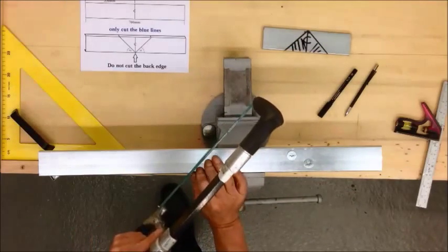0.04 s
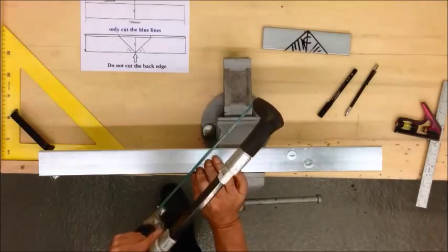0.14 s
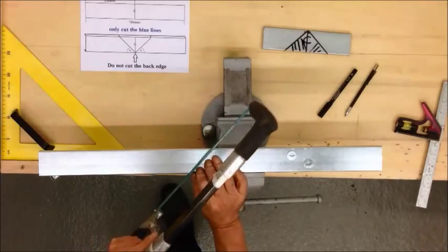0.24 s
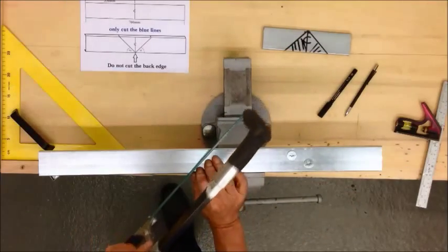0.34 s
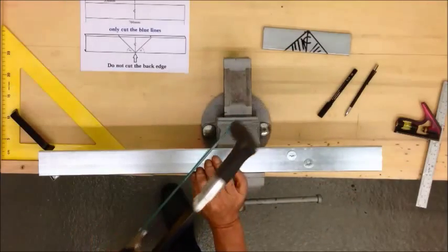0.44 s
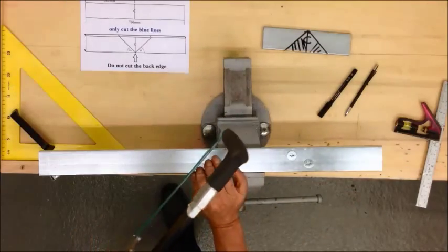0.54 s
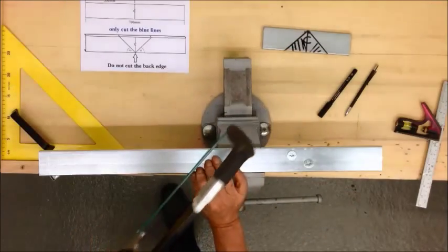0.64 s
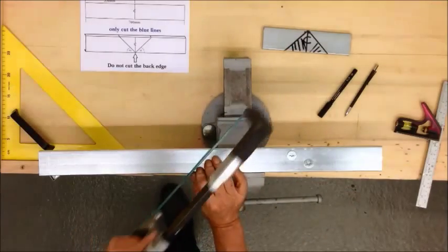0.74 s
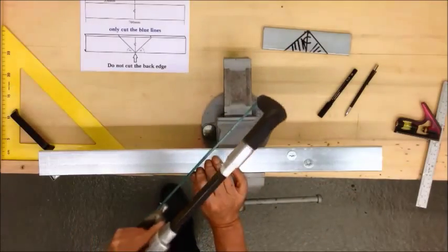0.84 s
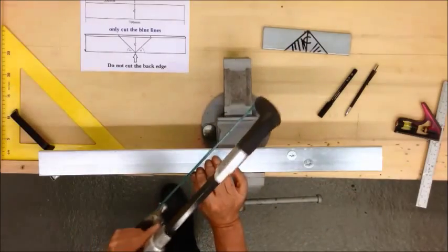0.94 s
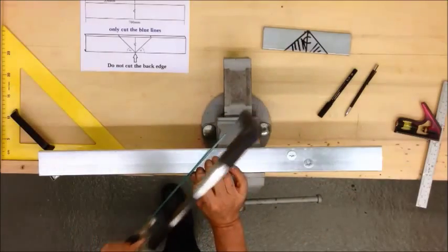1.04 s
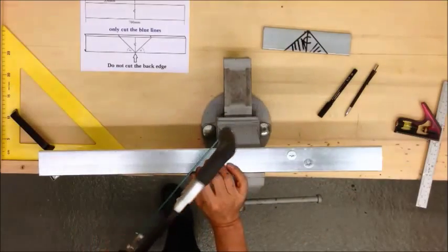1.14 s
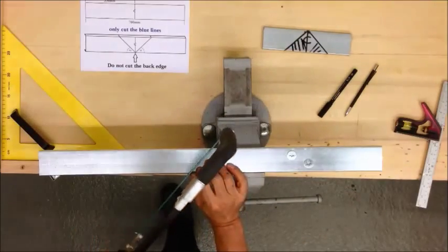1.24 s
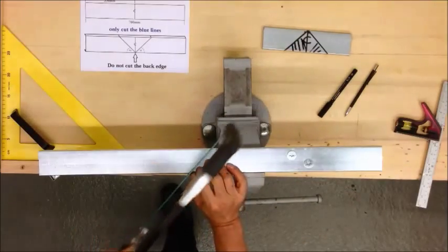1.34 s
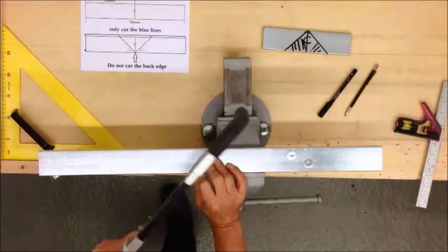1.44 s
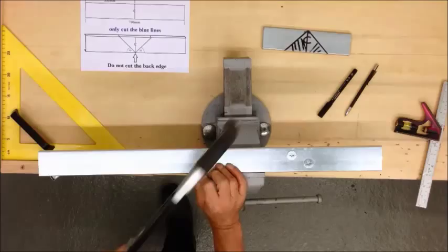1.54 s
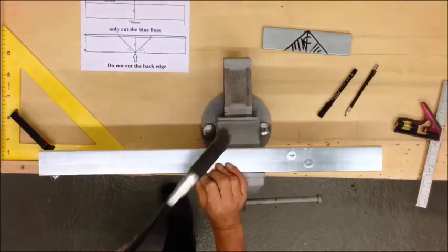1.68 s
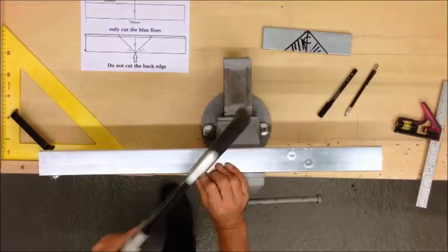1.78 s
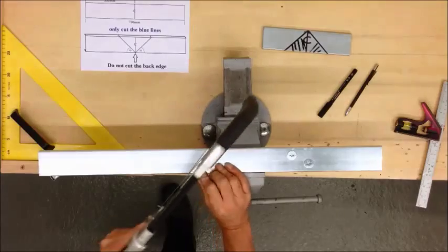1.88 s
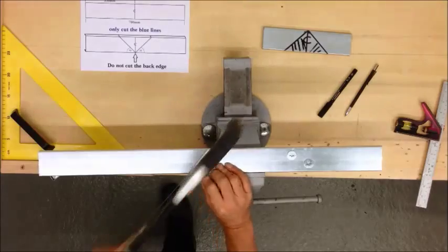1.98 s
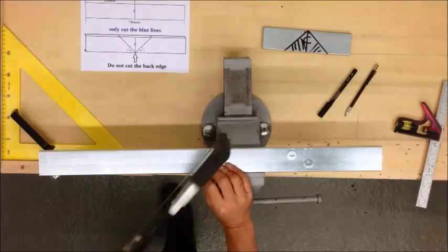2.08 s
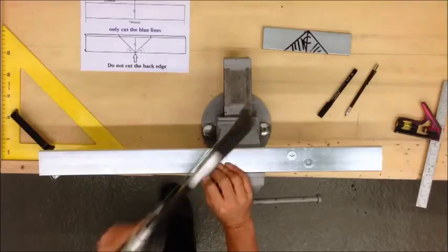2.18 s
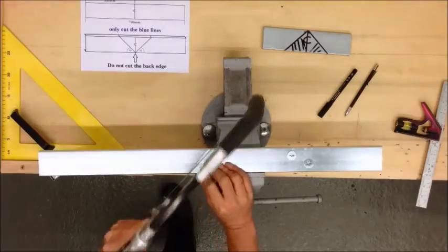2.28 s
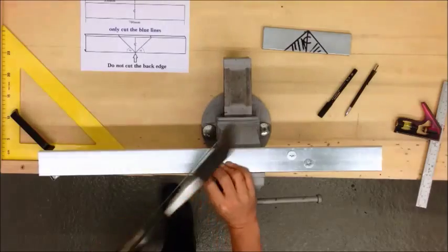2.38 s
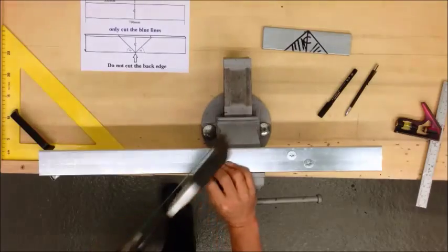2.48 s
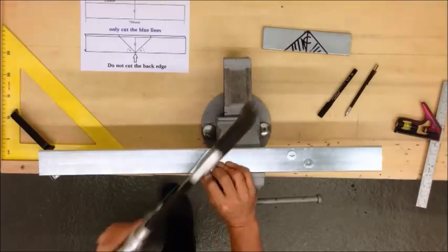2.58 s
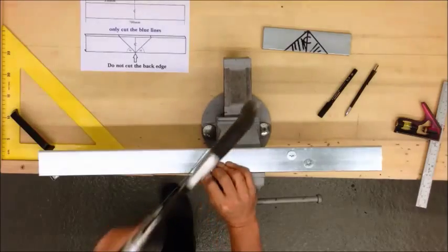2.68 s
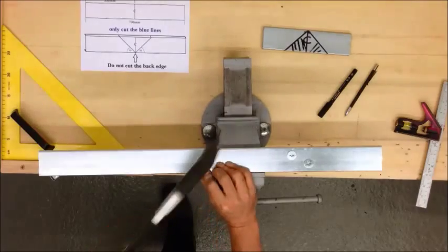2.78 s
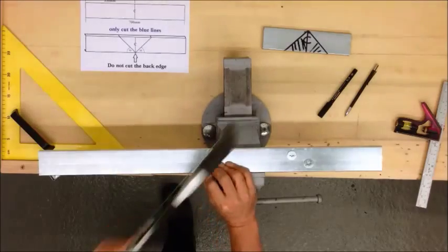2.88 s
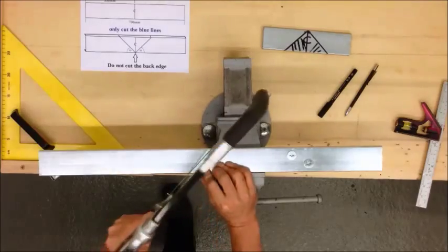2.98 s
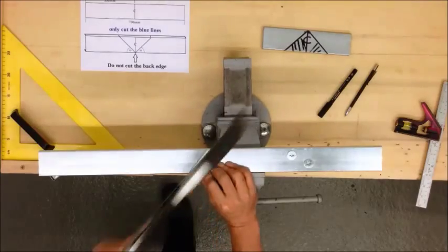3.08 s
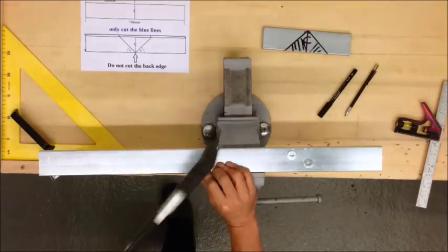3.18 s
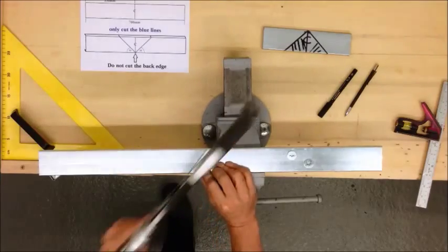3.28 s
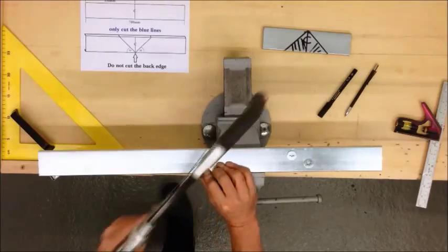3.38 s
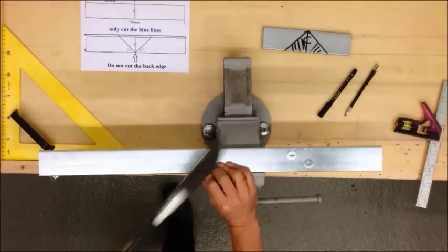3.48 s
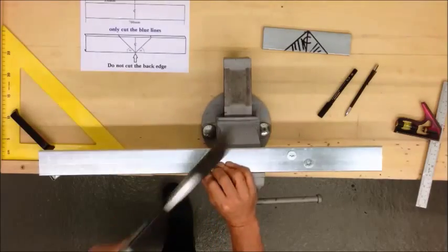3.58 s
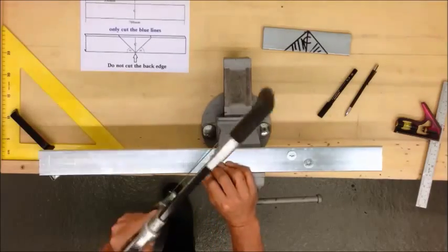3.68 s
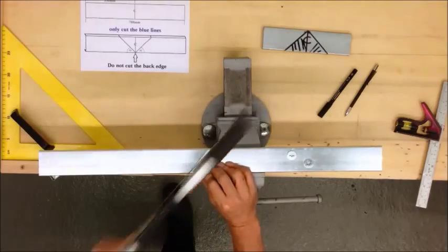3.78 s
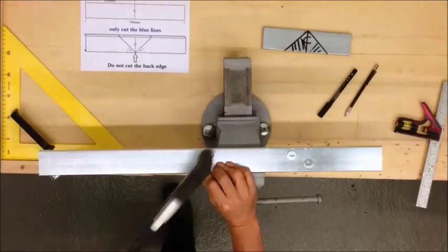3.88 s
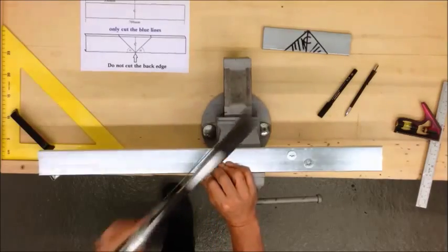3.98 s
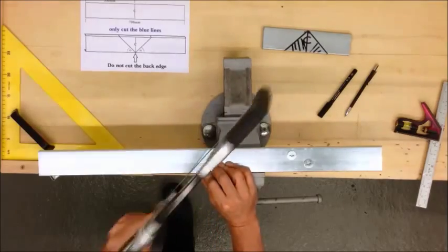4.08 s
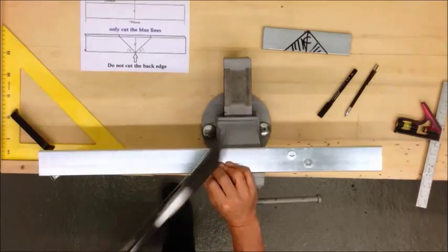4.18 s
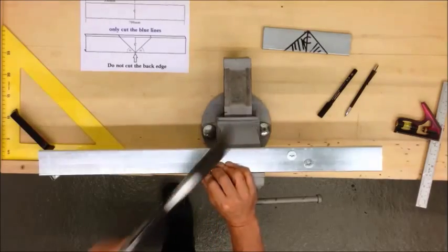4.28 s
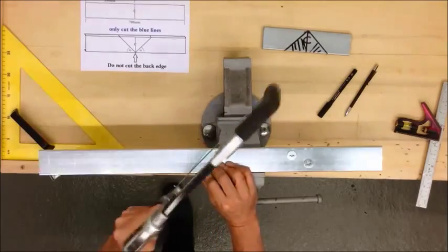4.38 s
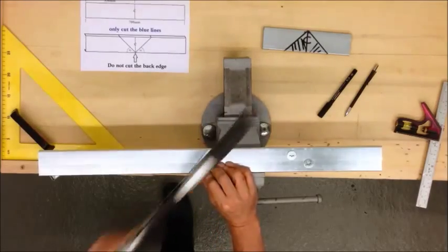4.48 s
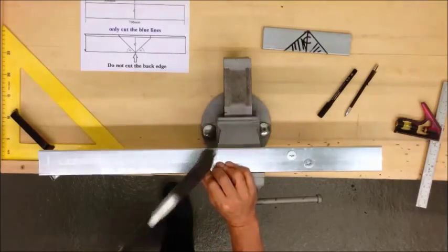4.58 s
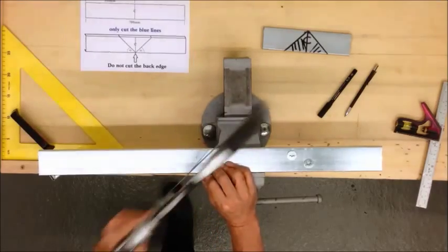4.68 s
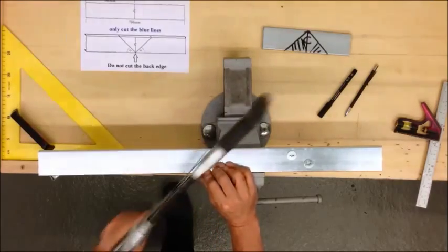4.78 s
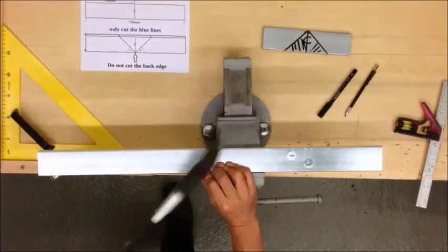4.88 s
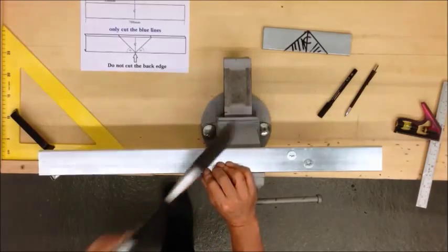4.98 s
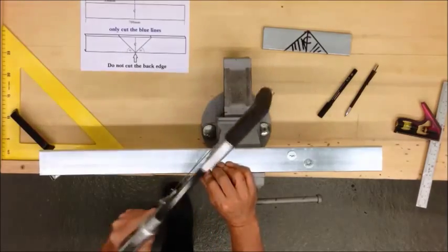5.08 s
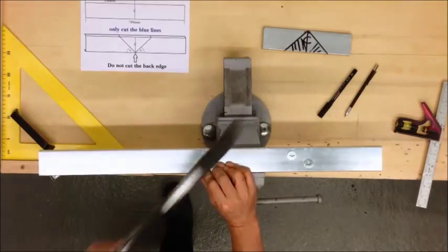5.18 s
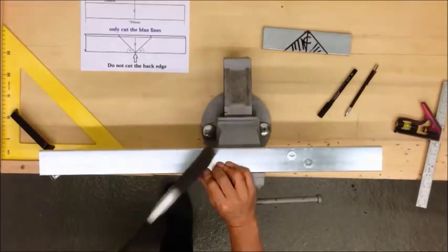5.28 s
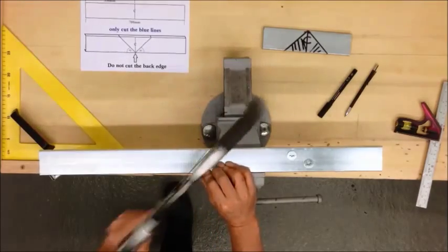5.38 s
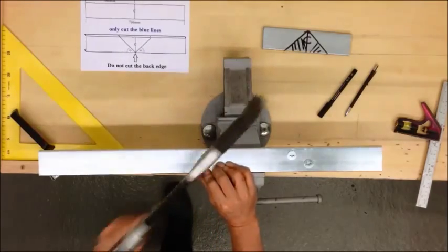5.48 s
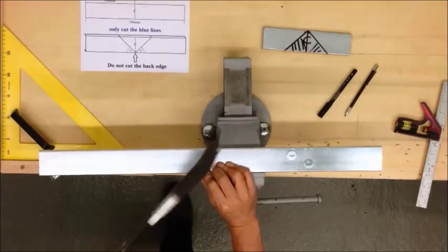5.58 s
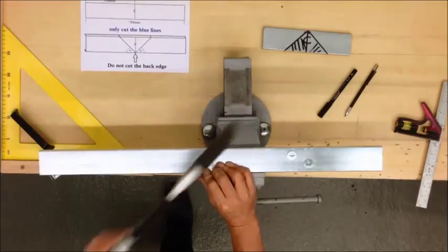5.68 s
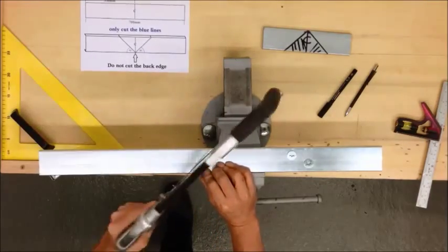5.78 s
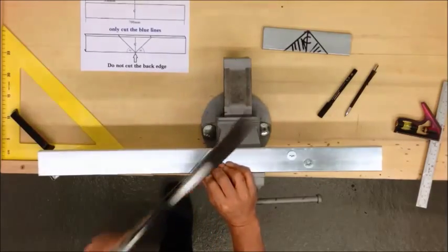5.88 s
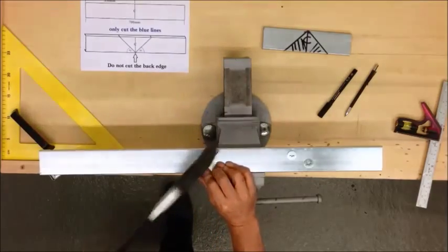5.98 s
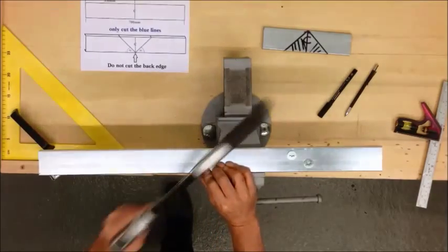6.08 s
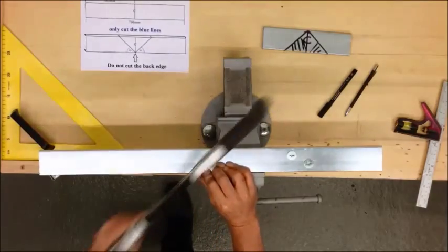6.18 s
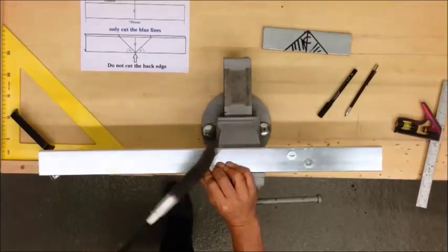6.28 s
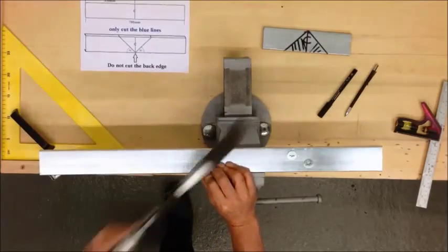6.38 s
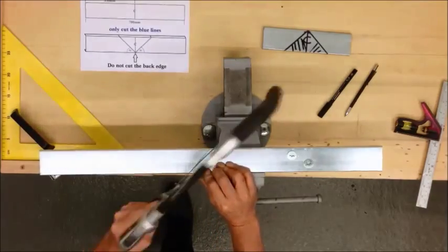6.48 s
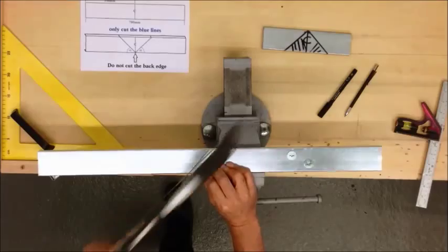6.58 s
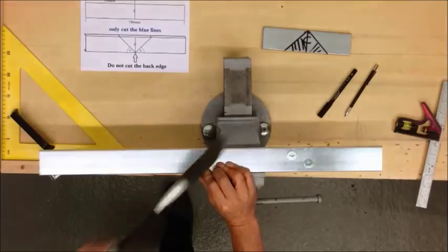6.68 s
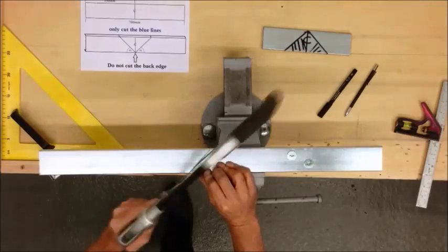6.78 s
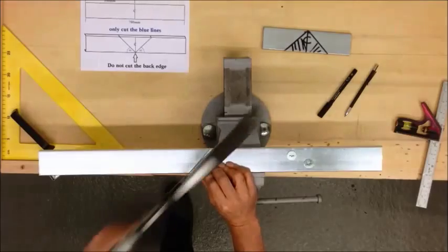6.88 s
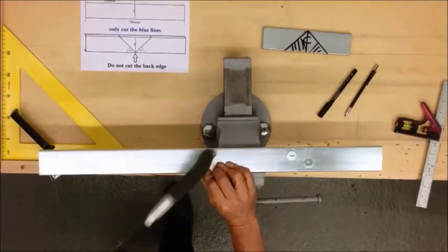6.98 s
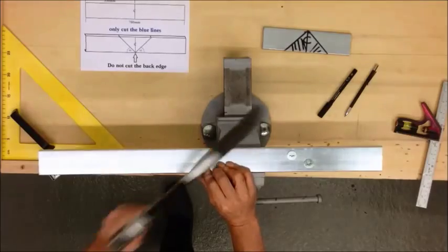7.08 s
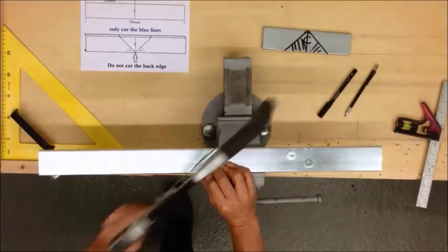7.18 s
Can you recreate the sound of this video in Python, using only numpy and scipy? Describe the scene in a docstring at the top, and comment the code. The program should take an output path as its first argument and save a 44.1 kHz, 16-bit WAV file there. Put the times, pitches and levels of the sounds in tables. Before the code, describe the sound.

A hand hacksaw rasps through thin sheet steel, a few slow strokes building to quick even ones with metallic ringing and squeaks.

```python
"""Hacksaw on sheet steel

A hand hacksaw cuts thin sheet in a bench vise: a few slow starting strokes, then quick even ones.
The teeth strike the edge at a rate that rises and falls with each stroke; their blows and the tearing
chips ring sheet and blade. The blade squeaks as the kerf deepens, the bench rumbles under the arm,
and a small workshop answers."""
import sys
import numpy as np
from scipy import signal
from scipy.fft import rfft, irfft
from scipy.io import wavfile
from scipy.ndimage import uniform_filter1d

SR = 44100
rng = np.random.default_rng(int(sys.argv[2]) if len(sys.argv) > 2 else 0)


def generate_wav(sig):
    """Save sig (samples, or channels by samples) to the path in sys.argv[1] as 16-bit PCM at SR."""
    pcm = np.round(np.clip(np.atleast_2d(sig).T, -1, 1) * 32767).astype(np.int16)
    wavfile.write(sys.argv[1], SR, pcm)


N = 319284
T = np.arange(N) / SR

# Levels in the tables are relative: each layer sets its own gain on top.
# workshop room tone: freq_hz, level_db
AIR_EQ = [(25, -1), (75, -1.5), (180, -0.5), (300, -13.5), (700, -9.5), (1400, -14.5), (2500, -13),
          (6000, -45), (15000, -45)]
# colour of tearing chips: freq_hz, level_db
SCRAPE_EQ = [(200, -38), (480, -15), (800, -5), (1030, -7.5), (1250, 6.5), (1650, -5), (2350, -0.5),
             (2950, -3.5), (4200, 0.5), (4900, -4), (7400, -4), (10000, -8), (13000, -6), (15300, -14)]
# ring of sheet, blade and frame: pitch_hz, width_hz, level_db
STEEL_MODES = [(641, 6.8, 11), (930, 77, -3.5), (1206, 12, -8), (1334, 6.3, 11.5), (1467, 16, -1.5),
               (1712, 20, 2.5), (1795.2, 10, -17), (1900, 12, -11), (2320, 32, -1), (2655, 50, -2.5),
               (3418, 29, 0), (3585, 38, 0.5), (4079, 74, 7.5), (4205, 26, 0.5), (5190, 70, -3),
               (7160, 59, -14), (9200, 120, -4), (12600, 240, -10)]
# fine high ring of the sheet: pitch_hz, width_hz (before sharpening), level_db
SHIMMER_MODES = [(7410, 65, -2.5), (9100, 60, 1), (10700, 120, 1), (11450, 290, -8), (12300, 350, -7),
                 (13300, 58, -6), (14300, 78, -6)]
# ring of the sheet's free edge: pitch_hz, width_hz, level_db
EDGE_MODES = [(1193, 18.4, 3.5), (1268, 15, 3), (1325, 7.4, 7), (1393, 6.4, 6), (1497, 66, -3),
              (3540, 30, -16), (3970, 53, -6), (4220, 19, -1)]
# single teeth snagging hard on the edge: start_s, level_db
HARD_SNAGS = [(.164, -49), (.63, -26.5), (1.125, -39.5), (2.174, -24.5), (4.14, -21.5), (4.827, -22.5),
              (5.642, -21)]
# pushes and pulls in turn, rate and bite at mid-stroke: start_s, length_s, tooth_rate_hz, bite_db
STROKES = [(0.323, 0.46, 420, -52.5), (.775, 0.25, 640, -47.5), (1.099, 0.24, 680, -43),
           (1.466, .18, 600, -52.5), (1.644, 0.17, 960, -41), (1.821, 0.22, 890, -45),
           (2.048, 0.19, 1000, -40.5), (2.243, 0.2, 900, -41.5), (2.434, 0.18, 1250, -34.5),
           (2.617, 0.19, 1000, -41), (2.822, 0.16, 1400, -34), (2.983, 0.18, 1830, -38.5),
           (3.174, 0.16, 1750, -35.5), (3.331, 0.19, 1970, -38.5), (3.527, 0.17, 1920, -35.5),
           (3.69, 0.19, 2050, -38), (3.88, 0.16, 2220, -35), (4.044, 0.19, 2150, -37.5),
           (4.237, 0.16, 1960, -35.5), (4.396, 0.19, 2220, -36.5), (4.583, .16, 2320, -36.5),
           (4.754, 0.16, 2180, -38), (4.93, 0.16, 2000, -37.5), (5.088, 0.18, 1810, -36.5),
           (5.26, .179, 2280, -36.5), (5.44, 0.18, 1810, -35.5), (5.616, 0.18, 2030, -37.5),
           (5.789, 0.16, 1810, -39.5), (5.974, 0.19, 2290, -37), (6.156, 0.13, 2160, -40),
           (6.307, 0.17, 2510, -37.5), (6.483, 0.17, 2390, -40), (6.65, 0.16, 2140, -39),
           (6.82, 0.16, 2290, -43), (6.984, 0.16, 2470, -38), (7.164, 0.19, 2700, -39)]
# feel of each direction: slow_sag_db, quick_sag_db (bite lost over a stroke),
# then the trims snag_db, squeak_db, tone_db, rumble_db, whistle_db
PUSH_FEEL = dict(slow_sag_db=-3.5, quick_sag_db=12, snag_db=9, squeak_db=4, tone_db=-1, rumble_db=-3, whistle_db=-1)
PULL_FEEL = dict(slow_sag_db=18, quick_sag_db=-1, snag_db=-7, squeak_db=-2.5, tone_db=1, rumble_db=1.5, whistle_db=0.5)
# the balance as the kerf deepens: time_s, tone_db, rumble_db, whistle_db
KERF_MIX = [(.4, -10, -69, -15), (1.2, -11.5, -64.5, -13.5), (1.798, -10.5, -59.5, -9.5),
            (2.6, -6.5, -55, -13), (3.3, -2.5, -56, -8), (4.1, -0.5, -52.5, -7), (4.5, -2, -57, -1),
            (4.8, 0, -56, -8.5), (5.3, 2, -54, -8), (5.8, 3, -56, -7.5), (6.4, 5, -57.5, -4),
            (7.2, 5, -60.5, -12)]
# colour of tooth blows: freq_hz, level_db
TOOTH_EQ = [(150, -28.5), (450, -10), (780, -8), (1050, -8), (1400, 4), (1900, 4.5), (2450, 3.5),
            (3000, -9.5), (4200, -8.5), (5500, -13.5), (12000, -22.5)]
# colour of the bench rumble: freq_hz, level_db
BENCH_EQ = [(25, -27), (60, -22), (90, -5.5), (115, -1.5), (155, -5), (200, 1), (250, 0.5), (310, -5.5),
            (420, -10), (800, -17), (2000, -84)]
# ring of bench top and vise: pitch_hz, width_hz, level_db
BENCH_MODES = [(114.2, 6.5, 5.5), (134.4, 4.1, 2.5), (181.5, 4.6, 7.5), (217, 2.9, 8.5), (259, 2.6, 1.5),
               (354, 3.8, 11)]
# loudest squeaks of the blade in the kerf: start_s, length_s, pitch_hz, level_db
LOUD_SQUEAKS = [(.803, 0.037, 1275, -39.5), (1.835, 0.074, 1254, -42), (3.045, .024, 1754, -32.5),
                (3.387, 0.032, 1781, -31.5), (3.919, .035, 1783, -30), (4.137, 0.013, 2156, -26),
                (4.278, 0.015, 1882, -25.5), (4.28, 0.0421, 3570, -30), (4.501, 0.02906, 1705, -31),
                (4.615, .019, 1900, -24.5), (4.785, 0.01405, 2058, -27), (4.822, 0.022, 2218, -27.5),
                (4.955, .022, 1755, -25.5), (5.145, 0.0498, 1800, -29), (5.534, .017, 1780, -26),
                (5.633, 0.0256, 1342, -27.5), (5.883, 0.023, 1763, -33.5), (6.183, 0.02, 2080, -27),
                (6.675, 0.031, 2414, -28), (6.895, .014, 2210, -27), (7.199, .028, 2257, -27.5)]
# the bench jolting under the arm: start_s, rise_s, level_db
BENCH_JOLTS = [(1.526, 0.017, -60), (1.839, 0.0082, -50), (2.388, .012, -56), (2.731, .012, -49),
               (3.494, 0.01, -46), (3.839, .009, -49), (4.084, 0.02, -46), (4.994, .012, -48)]

SLOW_HZ, QUICK_HZ = 452, 1900  # tooth rates of a careful stroke and of one in full swing
NOTCH_S, SINK_DB_PER_S = 1.56, 7  # the blade skates in a notch until then; later the kerf damps the edge
BINDS_FROM_S = 4  # from here on the kerf is deep enough to pinch the blade at the turns


def undb(db):
    """Decibels to gain."""
    return 10 ** (np.asarray(db) / 20)


def unit(x):
    """Scale to rms 1."""
    return x / np.sqrt(np.mean(x ** 2))


def noise():
    """White noise."""
    return rng.standard_normal(N)


def walk(rate):
    """Random drift with spread 1, changing about rate times a second."""
    return unit(np.interp(T * rate, np.arange(N), noise()))


def butter(x, hz, kind):
    """Second-order low-pass, high-pass or band-pass."""
    return signal.sosfilt(signal.butter(2, hz, kind, fs=SR, output="sos"), x)


def colour(x, points, size=4096):
    """Minimum-phase EQ through (freq_hz, level_db) points that keeps the power of white noise."""
    hz, db = np.transpose(points)
    grid = np.maximum(np.fft.rfftfreq(size, 1 / SR), 1)
    cepstrum = irfft(np.log(undb(np.interp(np.log(grid), np.log(hz), db))))
    cepstrum[1:size // 2] *= 2
    cepstrum[size // 2 + 1:] = 0
    response = irfft(np.exp(rfft(cepstrum)))
    return signal.fftconvolve(x, response / np.linalg.norm(response))[:N]


def ring(x, hz, width):
    """One mode, gain 1 at its centre."""
    return signal.lfilter(*signal.iirpeak(hz, hz / width, fs=SR), x)


def resonate(force, modes):
    """A force is heard directly and through every mode of the body it acts on."""
    return force + sum(undb(db) * ring(force, hz, width) for hz, width, db in modes)


def room_tone(level_db=-69):
    """A faint, dark bed of workshop air."""
    return undb(level_db) * colour(noise(), AIR_EQ)


def resting_rub(level_db=-80):
    """Even at rest the blade rubs lightly in its notch."""
    return undb(level_db + 2 * walk(11.7)) * colour(noise(), SCRAPE_EQ)


def shimmer(force, gain_db=-3, sharpness=4):
    """Narrow high modes give the hiss its steely edge."""
    modes = (undb(db) * ring(force, hz, width / sharpness) for hz, width, db in SHIMMER_MODES)
    return undb(gain_db) * sum(modes)


def sheet_edge(bite, gain_db=-2.5, resting_db=-76, skate_db=-48, skate_shape=0.62,
               linger_hz=1336, linger_s=0.065, linger_db=-10):
    """Skating teeth ring the edge even at a light touch; the ring fades as the blade sinks in."""
    skating = undb(skate_db) * (bite / bite.max()) ** skate_shape
    damping = undb(-SINK_DB_PER_S * np.maximum(T - NOTCH_S, 0))
    drive = (bite + skating + undb(resting_db)) * damping
    rubbing = noise()
    rings = unit(sum(undb(db) * ring(ring(rubbing, hz, width), hz, 5 * width)
                     for hz, width, db in EDGE_MODES))
    # steady rubbing evens out the beats between the modes
    rings *= drive / np.sqrt(uniform_filter1d(rings ** 2, size=1500) + .05)
    # the least damped mode stores the drive and sings on through the pauses
    keep = np.exp(-1 / (linger_s * SR))
    stored = signal.lfilter([1 - keep], [1, -keep], drive)
    lingering = stored * np.sin(2 * np.pi * linger_hz * T + .7 * walk(9.3))
    return undb(gain_db) * (rings + undb(linger_db) * lingering)


def workshop(x, wet_db, t60_s=0.4, treble_t60_s=0.32, late_t60_s=1.0, late_db=-21):
    """Bench top and near walls answer at once; the rest of the room leaves a faint tail."""
    t = T[:SR]
    near, far = rng.standard_normal((2, SR))
    low = butter(near, 7000, "low") * undb(-60 * t / t60_s)
    high = butter(near, 7000, "high") * undb(-60 * t / treble_t60_s)
    early = (low - high) * (t > .002)
    late = butter(far, 5000, "low") * undb(-60 * t / late_t60_s)
    response = undb(wet_db) * early / np.linalg.norm(early) + undb(late_db) * late / np.linalg.norm(late)
    return x + signal.fftconvolve(x, response)[:N]


def snags(decay_s=.02, gain_db=-11):
    """A caught tooth lets go with a short scrape: after every turn, and now and then a harder one."""
    envelope = np.zeros(N)
    at_turns = [(start, force_db + feel["snag_db"]) for start, force_db, feel in turns()]
    for start, db in at_turns + list(HARD_SNAGS):
        on = (T >= start) & (T < start + .1)
        envelope[on] += undb(db) * np.exp((start - T[on]) / decay_s)
    return undb(gain_db) * colour(butter(envelope * noise(), 6000, "low"), SCRAPE_EQ)


def strokes():
    """Each stroke with the feel of its direction and its mix of tone_db, rumble_db, whistle_db."""
    times, *columns = np.transpose(KERF_MIX)
    for (start, length, top_hz, bite_db), feel in zip(STROKES, [PUSH_FEEL, PULL_FEEL] * len(STROKES)):
        kerf_db = np.array([np.interp(start + length / 2, times, column) for column in columns])
        mix_db = kerf_db + [feel["tone_db"], feel["rumble_db"], feel["whistle_db"]]
        yield start, length, top_hz, bite_db, feel, mix_db


def turns(catch_s=.022):
    """The teeth break loose just after each turn, harder as they bite and sing more."""
    return [(start + catch_s, bite_db + tone_db, feel)
            for start, _, _, bite_db, feel, (tone_db, _, _) in strokes()]


def arm(speed_shape=.6, quick_bite_shape=0.82, slow_bite_shape=1.9, jerk=.06):
    """Each stroke swings jerkily from rest to rest, slow ones biting only near the middle."""
    rate, bite, tone, load, whistle = np.zeros((5, N))
    for start, length, top_hz, bite_db, feel, mix_db in strokes():
        on = (T >= start) & (T < start + length)
        along = (T[on] - start) / length
        swing = np.sin(np.pi * along)
        shape = np.interp(top_hz, [SLOW_HZ, QUICK_HZ], [slow_bite_shape, quick_bite_shape])
        sag_db = np.interp(top_hz, [SLOW_HZ, QUICK_HZ], [feel["slow_sag_db"], feel["quick_sag_db"]])
        rate[on] = top_hz * swing ** speed_shape
        bite[on] = swing ** shape * undb(bite_db - sag_db * (along - .5))
        tone[on], load[on], whistle[on] = undb(mix_db)
    return rate * np.exp(jerk * walk(45)), bite, tone, uniform_filter1d(load, size=1500), whistle


def teeth(rate, uneven_db=4.0):
    """One blow for each passing tooth; returns the blows and the phase between teeth."""
    speed = rate * np.maximum(1 + .055 * walk(160) + .065 * walk(1200), .1)
    passed = np.cumsum(speed) / SR
    at = np.flatnonzero(np.diff(np.floor(passed)))
    strength = undb(uneven_db * noise()[:len(at)]) * np.sqrt(SR / np.maximum(speed[at], 300))
    # each blow is shared between the two samples around it
    late = (np.ceil(passed[at]) - passed[at]) / (passed[at + 1] - passed[at])
    blows = np.zeros(N)
    blows[at] += strength * (1 - late)
    blows[at + 1] += strength * late
    return butter(blows, 210, "high"), passed % 1


def cutting(rate, bite, tone, judder_db=1.48, grain_db=1.0, tear_share=0.34, tooth_db=-4.5,
            dull_hz=5000, bright_rate_hz=2000):
    """The rasp: teeth strike, each tears a gritty chip, and the blade judders in the kerf."""
    blows, phase = teeth(rate)
    grip = bite * unit(undb(judder_db * walk(170)))
    chips = unit(noise() * undb(grain_db * walk(2500)) * np.exp(-phase / tear_share))
    # slow teeth tear more softly, so less treble comes off them
    soft = signal.lfilter(*signal.butter(1, dull_hz, fs=SR), chips)
    chips = soft + np.minimum(rate / bright_rate_hz, 1.2) * (chips - soft)
    # runs of teeth catch and skip, which breaks up their tone
    catching = unit(undb(2.5 * walk(70)))
    buzz = colour(grip * catching * tone * blows, TOOTH_EQ)
    return colour(grip * chips, SCRAPE_EQ) + undb(tooth_db) * buzz


def chatter(rate, drive, spells_per_s=45, patchy_db=5, waver=0.0202, gain_db=-9.5):
    """In short random spells the blade locks to the teeth and squeals at their gliding rate."""
    squeal = np.sin(2 * np.pi * np.cumsum(rate * (1 + waver * walk(500))) / SR)
    spells = unit(undb(2 * patchy_db * np.tanh(walk(spells_per_s))))
    return undb(gain_db) * drive * spells * squeal * (rate / rate.max())


def blade_whistle(drive, pitch_hz=5931, width_hz=16, flutter_db=5.0, gain_db=-3):
    """A high mode of the taut blade sings while the teeth run and is choked when they stop."""
    singing = unit(ring(ring(noise(), pitch_hz, width_hz), pitch_hz, width_hz))
    singing /= np.sqrt(uniform_filter1d(singing ** 2, size=400) + 0.04)  # even out the swells
    return undb(gain_db) * drive * singing * unit(undb(flutter_db * walk(170)))


def bench_rumble(load, knock_db=3, gain_db=-6):
    """The strokes shake vise and bench top in dull, uneven knocks."""
    knocks = load * unit(noise() * undb(knock_db * walk(60)))
    return undb(gain_db) * resonate(colour(knocks, BENCH_EQ), BENCH_MODES)


def squeaks(turn_hz=2420, turn_s=0.022, pitch_spread=0.0253, fade_s=0.0043, waver=0.028,
            flutter_db=2, gain_db=-2.5):
    """The blade sticks and slips in wavering chirps: faint at the turns, loud where it binds."""
    out = np.zeros(N)
    wobble = 1 + waver * walk(600)
    pitches = turn_hz * (1 + pitch_spread * rng.standard_normal(len(STROKES)))
    at_turns = [(start, turn_s, hz, force_db + feel["squeak_db"])
                for (start, force_db, feel), hz in zip(turns(), pitches) if start > BINDS_FROM_S]
    for start, length, hz, db in at_turns + list(LOUD_SQUEAKS):
        on = (T >= start) & (T < start + length)
        envelope = np.minimum(np.minimum(T[on] - start, start + length - T[on]) / fade_s, 1)
        chirp = np.sin(2 * np.pi * hz * np.cumsum(wobble[on]) / SR)
        out[on] += undb(db + gain_db) * envelope * chirp
    return out * undb(flutter_db * walk(300))


def bench_jolts(gain_db=-5):
    """A hard stroke rocks the whole bench with a low thud."""
    envelope = np.zeros(N)
    for start, rise_s, db in BENCH_JOLTS:
        age = np.maximum(T - start, 0) / rise_s
        envelope += undb(db) * age * np.exp(1 - age)
    return undb(gain_db) * envelope * unit(butter(noise(), [75, 200], "band"))


def scene():
    """The mono mix: rasp and singing steel in the workshop, over dry bench and room tone."""
    rate, bite, tone, load, whistle = arm()
    force = resting_rub() + cutting(rate, bite, tone) + snags()
    rasp = workshop(resonate(force, STEEL_MODES) + shimmer(force), wet_db=-3.5)
    singing = sheet_edge(bite) + squeaks() + chatter(rate, bite * tone) + blade_whistle(bite * whistle)
    saw = rasp + workshop(singing, wet_db=-6.5)
    return (saw + room_tone() + bench_rumble(load) + bench_jolts())[None]


def record(dry, low_cut_hz=59, high_cut_hz=15300):
    """Roll off the deepest bass and cut the very top steeply."""
    high_cut = signal.ellip(12, .1, 80, high_cut_hz, fs=SR, output="sos")
    return signal.sosfilt(high_cut, butter(dry, low_cut_hz, "high"))


dry = scene()
out = record(dry)
generate_wav(out)
```